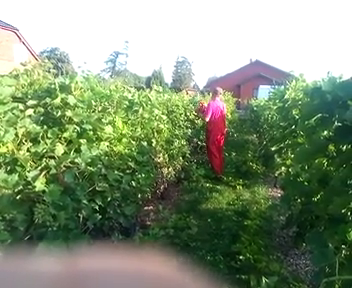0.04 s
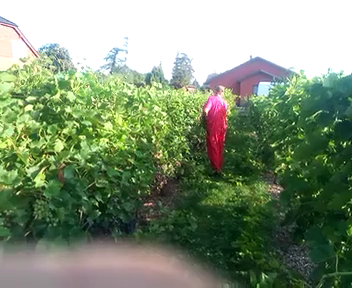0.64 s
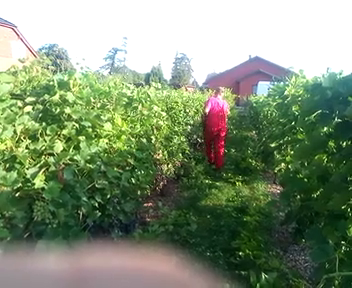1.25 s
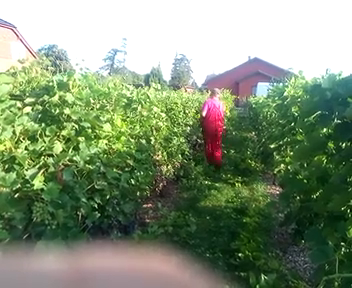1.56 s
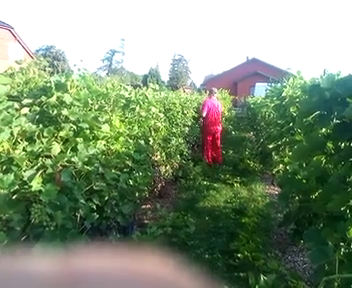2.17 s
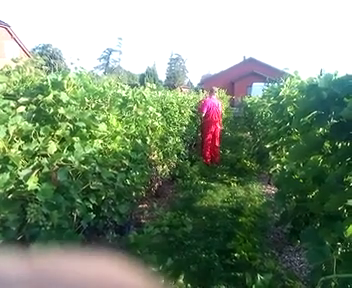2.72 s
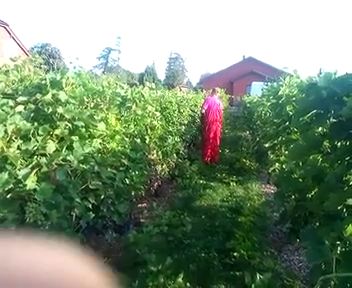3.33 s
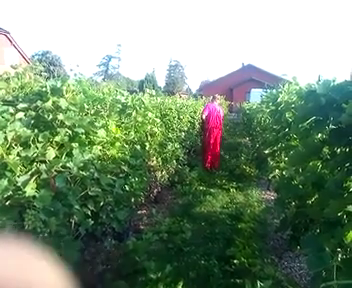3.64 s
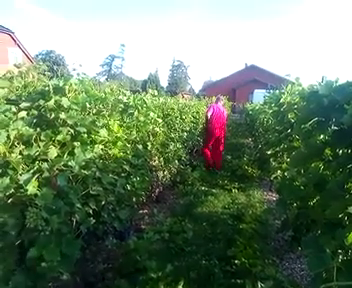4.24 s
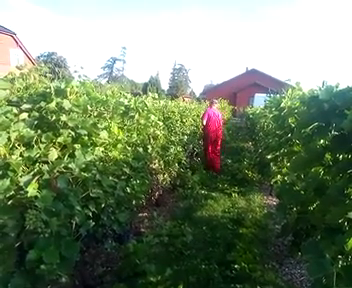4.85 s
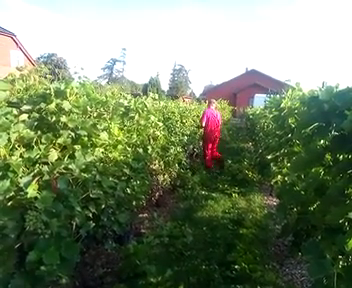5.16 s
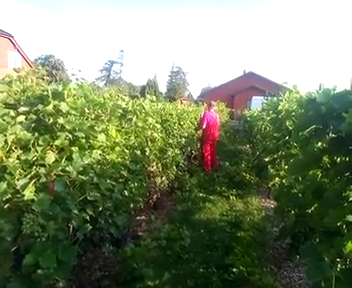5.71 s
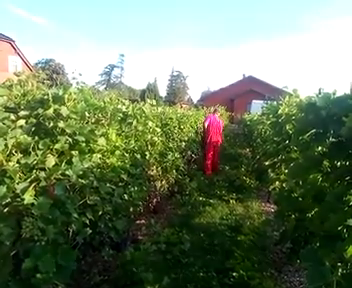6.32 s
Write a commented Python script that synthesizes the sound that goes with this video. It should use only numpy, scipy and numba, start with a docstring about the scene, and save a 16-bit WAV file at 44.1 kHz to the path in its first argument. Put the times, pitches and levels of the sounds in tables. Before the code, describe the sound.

A two-stroke hedge trimmer idles quietly about ten metres away among grapevines, a fast, even puttering with a thin metallic rattle and ring. Leaves rustle faintly now and then over a soft rumble of air. About halfway, a finger bumps and scrapes right at the microphone, followed by one sharp click, by far the loudest sound. The engine keeps idling to the end.

```python
"""A two-stroke hedge trimmer idles among grapevines some ten metres off.
Each firing pops the muffler; about a third of a turn later piston and drive rattle, over ringing steel.
Leaves scatter the sound and rustle as the gardener brushes them; the air rumbles softly.
Midway a finger slides off the camera with bumps, scrapes and squeaks, and its case clicks sharply."""
import sys
import numpy as np
from scipy import signal
from scipy.fft import rfft, irfft
from scipy.io import wavfile
from scipy.ndimage import uniform_filter1d, map_coordinates
from numba import njit

SR = 44100
rng = np.random.default_rng(int(sys.argv[2]) if len(sys.argv) > 2 else 0)


def unload_audio(sound):
    """Save the sound as a 16-bit wav file, at the path given as the first command line argument."""
    columns = np.transpose(np.atleast_2d(sound))
    # keep every value between -1 and 1, then stretch to whole-number steps
    steps = np.round(np.clip(columns, -1, 1) * 32767)
    wavfile.write(sys.argv[1], SR, steps.astype(np.int16))


N = 290178
TIME = np.arange(N) / SR
IDLE_HZ = 44.47

# midrange arriving via the leaves: (time [s], relative level [dB])
WASH_LEVEL = [(0.0, -44.5), (0.3, -48.5), (0.8, -51), (2.3, -55), (2.7, -52.5), (3.1, -56), (3.4, -53),
              (6.4, -57), (6.58, -54)]
# trimmer treble: (time [s], relative level [dB])
TREBLE_LEVEL = [(0.0, -57), (1.2, -68.5), (2.4, -68), (2.9, -60.5), (3.1, -66), (3.4, -63.5), (3.8, -64),
                (4.5, -64), (4.9, -69), (5.2, -72), (5.9, -62.5), (6.2, -67.5), (6.58, -61.5)]
# rumble of air and of finger drag: (frequency [Hz], level [dB])
RUMBLE_SPECTRUM = [(20, -23), (40, -20), (68, -1.5), (95, -4), (125, -8), (200, -16.5), (400, -18.5),
                   (1000, -44), (4000, -61), (16000, -84.5)]


def exhaust(turns):
    """Each firing rings muffler and outlet, with gas noise, leaf scatter, a low boom and a hum."""
    # muffler swinging in and out of the leaves: (time [s], relative level [dB])
    pop_level = [(0, -45.5), (.3, -45.5), (.65, -50), (1.15, -43), (1.45, -45.5), (1.9, -55), (2.25, -61.5),
                 (2.42, -49.5), (2.7, -45), (2.95, -49.5), (3.12, -62.5), (3.4, -51.5), (4.0, -49.5),
                 (4.5, -47.5), (4.72, -46), (4.82, -62), (5.2, -62), (5.32, -51), (6.58, -52.5)]
    # outlet resonance as the tool turns: (time [s], frequency [Hz])
    outlet_pitch = [(0, 900), (.25, 970), (.55, 1025), (1.0, 964), (1.6, 886), (2.2, 896), (3.3, 956),
                    (4.3, 844), (4.95, 918), (5.6, 970), (5.85, 900), (6.58, 910)]
    # muffler pop, leaf scatter, boom: (frequency [Hz], level [dB])
    pop_spectrum = [(300, -25.5), (520, -23), (600, 5), (660, 13.5), (780, 7), (1000, -5.5), (1120, -16),
                    (1500, -10), (2200, -20.5)]
    scatter_spectrum = [(300, -25.5), (510, -31), (580, -13.5), (650, 3), (780, 4.5), (930, 3.5), (1020, 3),
                        (1120, -1.5), (1220, -0.5), (1400, 3), (1530, 0), (1650, -11.5), (1900, -6.5),
                        (2200, -10.5), (3000, -71.5)]
    boom_spectrum = [(120, -25.5), (240, -9), (340, 4.5), (400, 3), (440, -3.5), (480, -2.5), (600, 7),
                     (1000, -57)]
    pop_db, wash_db = change(pop_level), change(WASH_LEVEL)
    firing_turns, echo_s = .74, .00656  # echo off the vine row
    firings = strokes(turns, lag_turns=firing_turns, jitter_s=.00017, scatter_db=1.5)
    echoes = strokes(turns, lag_turns=firing_turns + echo_s * IDLE_HZ, jitter_s=.00025, scatter_db=1.7)
    # crisp in plain sight, blurred behind the vines
    in_sight = np.clip(.8 + .17 * pop_db, .15, 2.2)
    pops = in_sight * unit(firings + undb(-1.5) * echoes)
    flutter = leaf_scatter(firings, decay_s=.012) + undb(-2) * bursts(firings, decay_s=.009, steady=.25)
    pop_hz = 864 - 8 * (pop_db - wash_db)  # lower as it stands out of the wash
    muffler = resonate(colour(pops + flutter, pop_spectrum), pop_hz, width_hz=163.)
    gas = pops + leaf_scatter(firings, decay_s=.025)
    gas += undb(-3) * bursts(firings, decay_s=.016, steady=.9)
    outlet_hz = curve(outlet_pitch)
    outlet = resonate(resonate(gas, outlet_hz, width_hz=123.), outlet_hz, width_hz=180.)
    wash = leaf_scatter(firings, decay_s=.03) + undb(2) * bursts(firings, decay_s=.016, steady=.9)
    boom = unit(colour(bursts(firings, decay_s=.022, steady=1.7), boom_spectrum))
    hum = np.sin(2 * np.pi * 7 * turns + .7 * walk(22)) * undb(2.5 * walk(14))  # 7th crank harmonic
    wash = leaf_echoes(colour(wash, scatter_spectrum), lag_s=.002966, share=.32)
    return (even(muffler) * undb(-55.5 + pop_db)
            + even(outlet) * undb(-56 + .72 * wash_db + swell_db("outlet"))
            + even(wash) * undb(-51 + .72 * wash_db + swell_db("wash"))
            + leaf_shade(boom) * undb(-65.5 + change(TREBLE_LEVEL) + swell_db("boom"))
            + unit(hum) * undb(-74 + swell_db("hum")))


def mechanism(turns):
    """Piston slap and loose drive parts knock once a turn, over ringing steel and cutter-bar modes."""
    # housing knock: (time [s], relative level [dB])
    knock_level = [(0.0, -56), (0.5, -55), (1.6, -55.5), (2.1, -58.5), (3.15, -61.5), (3.35, -52.5),
                   (4.7, -58.5), (5.25, -60.5), (5.5, -68), (5.67, -63.5), (5.8, -77), (5.92, -60.5),
                   (6.25, -55.5), (6.58, -59)]
    # housing knock, drive rattle, its bright edge: (frequency [Hz], level [dB])
    housing_spectrum = [(1200, -39.5), (1680, 6), (1840, -7), (2160, 10), (2370, -1.5), (2600, 0.5),
                        (2800, 7), (4000, -43)]
    rattle_spectrum = [(1800, -49.5), (2500, 2.5), (2850, -3.5), (3050, -4.5), (3300, 6.5), (3650, -0.5),
                       (3900, 5), (4180, -9.5), (4450, 2), (4900, -3.5), (5300, -62.5)]
    edge_spectrum = [(4000, -53.5), (4900, 12), (5600, 12), (6050, 11), (6400, 14.5), (6680, -3.5),
                     (7060, 8), (7330, -10.5), (7700, -4), (8050, -24.5), (9500, -28), (16000, -58)]
    wash_db, knock_db, treble_db = change(WASH_LEVEL), change(knock_level), change(TREBLE_LEVEL)
    housing_db, edge_db = -57.5 + knock_db, -67.5 + treble_db
    drive_db = .54 * wash_db + .37 * treble_db + swell_db("drive")
    slaps = strokes(turns, lag_turns=1.11, jitter_s=.0006, scatter_db=1.1)
    # each slap shakes loose an 8 ms cluster of contacts
    contacts = np.sqrt(np.maximum(uniform_filter1d(slaps ** 2, size=360), 0))
    clatter = bursts(contacts, decay_s=.011, steady=.75)
    jingle = bursts(contacts, decay_s=.02, steady=3)
    knock = bursts(contacts, decay_s=.017, steady=.15)
    housing = unit(colour(knock, housing_spectrum)) * undb(housing_db)
    rattle = unit(colour(clatter, rattle_spectrum)) * undb(-56 + drive_db)
    edge = leaf_echoes(colour(jingle, edge_spectrum), lag_s=.002, share=.3) * undb(edge_db)
    steel = ringing_steel(slaps, knock_db, wash_db, treble_db)
    bar = wavering(hz=4311, drift_hz=7, flutter_db=3) * undb(-69 + drive_db + swell_db("bar"))
    bar += ring(jingle, hz=2158, width_hz=25) * undb(housing_db - 13.5)
    bar += ring(jingle, hz=7082, width_hz=30) * undb(edge_db - 19.7)
    return leaf_shade(housing + rattle + edge) + steel + bar


def ringing_steel(slaps, knock_db, wash_db, treble_db):
    """The crankcase pings at each slap; crankcase, clutch drum and blades hold wavering tones."""
    # crankcase ping as the tool turns: (time [s], frequency [Hz])
    ping_pitch = [(0, 2630), (.85, 2820), (1.6, 2754), (3.05, 2744), (3.8, 2910), (4.3, 2830), (4.85, 2714),
                  (6.58, 2804)]
    # blade pitch sags: (centre [s], half length [s], drop [Hz])
    sags = [(2.148, .14, 59.44), (3.463, .19, 110.6), (4.742, .09, 28.5), (5.558, 0.077, 35.4),
            (6.11, 0.053, 30)]
    strikes = unit(slaps) + .4 * bursts(slaps, decay_s=.004, steady=0)
    ping_hz, case_db = curve(ping_pitch), swell_db("case")
    ping = unit(resonate(resonate(strikes, ping_hz, width_hz=110.), ping_hz, width_hz=170.))
    crankcase = even(ping) * undb(case_db) + undb(-6.5) * wavering(hz=2772, drift_hz=6, flutter_db=3)
    sag_hz = sum(hz * bell(s, half_s) for s, half_s, hz in sags)
    drum = wavering(hz=1045, drift_hz=4, flutter_db=2.2)
    blade = wavering(hz=4627 - sag_hz, drift_hz=10, flutter_db=1.7)
    overtone = wavering(hz=6466 - sag_hz, drift_hz=18, flutter_db=3) * (.9 + .4 * walk(250))
    return (crankcase * undb(-62.5 + .17 * knock_db + case_db)
            + drum * undb(-63.5 + 1.28 * wash_db + swell_db("drum"))
            + blade * undb(-64 + .43 * wash_db + swell_db("blade"))
            + overtone * undb(-73 + 1.15 * treble_db + swell_db("overtone")))


def swell_db(name):
    """One part sings out or is shaded as the tool turns."""
    # swells and dips: (centre [s], half length [s], change [dB], part)
    swells = [(.05, 0.18, 2.5, "drive"), (1.5, 0.38, 0.5, "drive"), (2.45, 0.27, 0, "drive"),
              (2.957, 0.78, 2, "drive"), (4.3, 0.16, 0.5, "drive"), (6.302, 0.12, 3.5, "drive"),
              (1.25, .3, 0.5, "wash"), (4.55, .25, 1, "wash"), (0.297, 0.17, 6.5, "outlet"),
              (1.3, 0.27, -4, "outlet"), (4.55, .2, 2, "outlet"), (2.5, .3, -5.5, "outlet"),
              (4.978, 0.086, 7, "outlet"), (5.527, 0.064, -13, "outlet"), (0.102, 0.3, 4.5, "hum"),
              (4.39, 0.35, 15.5, "hum"), (6.516, 0.23, 13, "hum"), (.15, .3, 1.5, "boom"),
              (1.15, 0.15, 3, "boom"), (1.797, 0.26, -2, "boom"), (2.236, 0.069, 6, "boom"),
              (2.798, 0.28, 3.5, "boom"), (3.2, 0.063, -7, "boom"), (4.19, 0.21, 6.5, "boom"),
              (4.95, 0.22, 3, "boom"), (5.5, 0.36, 9, "boom"), (6.297, 1, -2, "boom"),
              (0.46, 0.17, 9.5, "drum"), (4.67, 0.06, 8, "drum"), (0.852, 0.21, 5, "case"),
              (1.45, 0.19, -1, "case"), (1.72, 0.091, 2.5, "case"), (2.127, 0.06, 1.5, "case"),
              (2.866, 0.092, -15, "case"), (3.037, 0.1, 5, "case"), (4.336, 0.16, 3.5, "case"),
              (4.756, 0.2, 2.5, "case"), (5.65, 0.2, -1, "case"), (6.057, 0.043, -10, "case"),
              (6.277, 0.15, 3, "case"), (0.298, .3, 3.5, "blade"), (1.196, 0.12, 4, "blade"),
              (1.803, 0.38, 2.5, "blade"), (2.294, 0.12, -4, "blade"), (2.598, 0.2, 4.5, "blade"),
              (3.24, 0.055, 8, "blade"), (3.755, 0.094, 6, "blade"), (4.302, 0.27, -24, "blade"),
              (4.826, 0.055, 5, "blade"), (5.13, 0.075, -9, "blade"), (6.1, .05, -3, "blade"),
              (5.306, .07, 1.5, "blade"), (5.73, 0.26, 5.5, "blade"), (6.21, 0.039, 7.5, "blade"),
              (1.403, .35, -6, "bar"), (2.254, .13, -5, "bar"), (2.85, 0.22, 3.5, "bar"),
              (3.4, 0.18, -5, "bar"), (4.9, .3, -1, "bar"), (5.38, .1, 5, "bar"), (5.7, .07, 5, "bar"),
              (6.1, 0.086, -13, "bar"), (6.38, 0.083, 2.5, "bar"), (1.302, 0.23, -7, "overtone"),
              (3.185, 0.058, 8.5, "overtone"), (4.148, 0.14, 5, "overtone"), (4.5, 0.17, 9.5, "overtone"),
              (4.805, 0.1, -23, "overtone"), (5.086, 0.098, 10, "overtone"), (5.89, 0.037, 11, "overtone"),
              (6.42, 0.045, 11, "overtone")]
    return sum(db * bell(s, half_s) for s, half_s, db, part in swells if part == name)


def leaf_scatter(x, decay_s):
    """Four diffuse paths through the leaves fade in and out."""
    paths = (walk(2.2) * unit(convolve(x, fade(decay_s) * rng.standard_normal(SR // 2)))
             for _ in range(4))
    return unit(sum(paths))


def leaf_echoes(x, lag_s, share):
    """Three echoes off nearby leaves come and go, shifting the colour."""
    out = x
    for reach in (.37, 1, 1.61):
        echo = map_coordinates(x, [(TIME - reach * lag_s) * SR], order=1)
        out = out + share * np.tanh(walk(3.5)) * echo
    return unit(out)


def leaf_shade(x):
    """Swaying leaves shade narrow bands in random patches."""
    patch_hz, patch_s, depth_db = 190, .1, 2.
    hz, s, bands = signal.stft(x, SR, nperseg=1024)
    patches = rng.standard_normal((int(hz[-1] / patch_hz) + 2, int(s[-1] / patch_s) + 2))
    grid = np.meshgrid(hz / patch_hz, s / patch_s, indexing="ij")
    gain = undb(depth_db * map_coordinates(patches, grid))
    gain /= np.sqrt(np.mean(gain ** 2, axis=1, keepdims=True))
    return signal.istft(bands * gain, SR)[1][:N]


def moving_hollow(x):
    """A hollow in the midrange drifts between about 1.4 and 2 kHz."""
    # path of the hollow: (time [s], centre [Hz], share cancelled [0-1])
    hollow_path = [(0, 1900, 0.63), (1.201, 1890, 0.7), (1.75, 1860, 0.93), (2.3, 1990, 0.9),
                   (2.9, 1790, 0.48), (4.3, 1700, 0.52), (5.0, 1460, 0.57), (5.45, 1430, 0.5),
                   (5.8, 1590, 0.38), (6.58, 1680, 0.77)]
    s, hz, share = np.transpose(hollow_path)
    band = resonate(x, np.interp(TIME, s, hz), width_hz=690.)
    return x - np.interp(TIME, s, share) * band


def handling():
    """A finger bumps, scrapes and squeaks over the camera case, dragging out a rumble; the case clicks."""
    # finger bumps: (time [s], peak [dB], decay [s], low-pass [Hz])
    bumps = [(3.335, -44.5, 0.017, 130), (3.385, -47, 0.022, 160), (3.434, -43.5, 0.022, 260),
             (3.514, -44.5, 0.035, 199), (3.625, -32, 0.018, 696)]
    # case clicks: (time [s], peak [dB], low-pass [Hz])
    clicks = [(3.596, -33, 5000), (3.6221, -31.5, 6000), (3.646, -38, 4000), (3.952, -10, 16000)]
    # sticking skin: (centre [s], half length [s], pitch [Hz], level [dB])
    squeaks = [(3.475, 0.018, 2640, -50), (3.528, 0.0074, 2680, -46), (3.667, 0.0039, 2760, -42)]
    # finger scrapes: (centre [s], half length [s], level [dB])
    scrapes = [(3.34, 0.022, -53), (3.39, .009, -56), (3.426, 0.063, -50.5), (3.527, 0.042, -52),
               (3.606, 0.0076, -48), (3.66, 0.032, -50), (3.804, 0.15, -59)]
    # bump, click, scrape: (frequency [Hz], level [dB])
    thud_spectrum = [(20, -24), (45, -12), (70, -1), (105, 1), (140, -4), (200, -10), (250, -12), (480, -8),
                     (800, -22), (3000, -50), (9000, -85)]
    click_spectrum = [(60, -9), (200, 5), (700, 0.5), (1900, 3.5), (2600, -8.5), (3400, 3.5), (4400, -1.5),
                      (5600, -10.5), (6700, -17.5), (7800, -29), (10000, -43), (11000, -30), (13000, -32),
                      (16000, -32)]
    rub_spectrum = [(300, -22), (1300, 20), (2200, 7), (5000, 9), (7000, -2.5), (8500, -13), (9100, -42),
                    (9800, -49), (16000, -70)]
    out = np.zeros(N)
    for s, db, decay_s, top_hz in bumps:
        push = noise() * (TIME >= s) * np.exp(-np.abs(TIME - s) / decay_s)
        thud = low_pass(colour(push, thud_spectrum), top_hz)
        out += thud * undb(db) / np.abs(thud).max()
    for s, db, top_hz in clicks:
        tick = low_pass(colour(signal.unit_impulse(N, int(s * SR)), click_spectrum), top_hz)
        out -= tick * undb(db) / np.abs(tick).max()
    for s, half_s, hz, db in squeaks:
        out += wavering(hz, drift_hz=25, flutter_db=1) * bell(s, half_s) * undb(db)
    grains = noise() * undb(2.3 * walk(900) + 1.2 * walk(50))
    rub = unit(colour(grains, rub_spectrum)) * envelope(scrapes)
    contact = np.interp(TIME, [3.29, 3.35, 3.67, 3.74], [0, 1, 1, 0])
    drag = contact * unit(colour(noise(), RUMBLE_SPECTRUM)) * undb(-58)
    return out + rub + drag


def foliage():
    """The gardener brushes leaves and twigs in short, crackly rustles."""
    # brushes: (centre [s], half length [s], level [dB])
    rustles = [(.65, 0.11, -64), (2.87, 0.056, -70.5), (2.99, .04, -70), (3.9, 0.12, -68), (4.22, .06, -64),
               (4.704, 0.086, -67), (4.943, 0.043, -71), (5.313, .06, -73), (5.7, .08, -73),
               (5.87, 0.044, -67), (6.16, 0.069, -66), (6.36, .05, -62.5)]
    # leaf rustle: (frequency [Hz], level [dB])
    rustle_spectrum = [(1500, -36), (3500, -0.5), (5600, 2), (6600, -6), (7700, -5.5), (8100, -17),
                       (9000, -31), (16000, -48)]
    crackle = noise() * undb(4.5 * walk(700))
    return unit(colour(crackle, rustle_spectrum)) * envelope(rustles)


def air():
    """Moving air rumbles in soft gusts over a faint, even hiss."""
    # puffs at the microphone: (centre [s], half length [s], rise [dB])
    gusts = [(0.085, 0.057, 5.5), (0.93, 0.081, 9.5), (1.435, 0.026, 3), (2.0, 1.5, 4), (2.78, 0.058, 6),
             (3.176, 0.03, 7), (4.33, 0.025, 7), (5.98, 0.085, 9), (6.3, .5, 1)]
    # hiss: (frequency [Hz], level [dB])
    hiss_spectrum = [(100, -2), (8000, 5), (9800, -3), (11000, 2), (13500, -3), (14800, 1.5), (16000, 9)]
    gust_db = sum(db * bell(s, half_s) for s, half_s, db in gusts)
    flutter_db = 5 * np.tanh(walk(18))
    rumble = unit(colour(noise(), RUMBLE_SPECTRUM)) * undb(-66.5 + gust_db + flutter_db)
    return rumble + unit(colour(noise(), hiss_spectrum)) * undb(-81)


def strokes(turns, lag_turns, jitter_s, scatter_db):
    """One impulse per crank turn, scattered in timing and strength."""
    chance = rng.standard_normal((int(turns[-1]), 2))
    when_s = np.interp(np.arange(len(chance)) + lag_turns, turns, TIME) + jitter_s * chance[:, 0]
    out = np.zeros(N)
    out[np.clip((when_s * SR).astype(int), 0, N - 1)] = undb(scatter_db * chance[:, 1])
    return out


def bursts(pulses, decay_s, steady):
    """A noise puff per pulse, over a floor of steady times the puffs' mean power."""
    power = np.maximum(convolve(pulses ** 2, fade(decay_s / 2)), 0)
    return unit(noise() * np.sqrt(power / power.mean() + steady))


def wavering(hz, drift_hz, flutter_db):
    """Sustained tone, unsteady in pitch and level."""
    phase = 2 * np.pi * np.cumsum(hz + drift_hz * walk(45)) / SR
    return unit(np.sin(phase) * undb(flutter_db * walk(30)))


def ring(x, hz, width_hz):
    """One mode driven by x, at rms 1."""
    return unit(convolve(x, fade(1 / (np.pi * width_hz)) * np.sin(2 * np.pi * hz * TIME[:SR // 2])))


@njit
def resonate(x, hz, width_hz):
    """State-variable band-pass with a moving centre."""
    y, band, low = np.empty(len(x)), 0., 0.
    for i in range(len(x)):
        g, k = np.tan(np.pi * hz[i] / SR), width_hz / hz[i]
        v = (band + g * (x[i] - low)) / (1 + g * (g + k))
        band, low, y[i] = 2 * v - band, low + 2 * g * v, k * v
    return y


def colour(x, spectrum, size=4096):
    """Minimum-phase filter from (frequency [Hz], level [dB]) rows."""
    hz, db = np.transpose(spectrum)
    bins_hz = np.maximum(np.fft.rfftfreq(size, 1 / SR), 1)
    gain = undb(np.interp(np.log(bins_hz), np.log(hz), db))
    cepstrum = irfft(np.log(gain))
    cepstrum[1:size // 2] *= 2
    cepstrum[size // 2 + 1:] = 0
    return convolve(x, irfft(np.exp(rfft(cepstrum))))


def low_pass(x, top_hz):
    """Second-order treble cut."""
    return signal.sosfilt(signal.butter(2, top_hz, fs=SR, output="sos"), x)


def convolve(x, response):
    """Apply an impulse response."""
    return signal.fftconvolve(x, response)[:N]


def noise():
    """White noise, rms 1."""
    return rng.standard_normal(N)


def walk(rate_hz):
    """Smooth random drift, rms 1."""
    hold = max(int(SR / rate_hz), 2)
    steps = np.repeat(rng.standard_normal(N // hold + 1), hold)
    return unit(uniform_filter1d(uniform_filter1d(steps, hold), hold)[:N])


def fade(decay_s):
    """Exponential decay, 0.5 s long."""
    return np.exp(-TIME[:SR // 2] / decay_s)


def bell(s, half_s):
    """Smooth rise to 1 at time s and back."""
    return np.exp(-((TIME - s) / half_s) ** 2)


def envelope(events):
    """Gain from (centre [s], half length [s], level [dB]) rows."""
    return sum(undb(db) * bell(s, half_s) for s, half_s, db in events)


def curve(table):
    """Join (time [s], value) rows linearly."""
    return np.interp(TIME, *np.transpose(table))


def change(table):
    """Level curve in dB about its mean."""
    return curve(table) - curve(table).mean()


def even(x):
    """Hold rms 1 over a sliding 1/6 s."""
    return x / np.sqrt(uniform_filter1d(x ** 2, size=SR // 6) + 1e-18)


def unit(x):
    """Scale to rms 1."""
    return x / np.sqrt(np.mean(x ** 2))


def undb(db):
    """Decibels to gain."""
    return 10 ** (np.asarray(db) / 20)


def scene():
    """The crank angle times the trimmer; rustles, air and handling join it in mono."""
    # idle hunting: (time [s], offset from IDLE_HZ [Hz])
    hunting = [(0, .03), (.7, .18), (1.5, -.12), (3.0, -.22), (3.35, .58), (4.2, .28), (4.8, -.62),
               (5.45, .23), (6.58, -.17)]
    turns = .18 + np.cumsum(IDLE_HZ + curve(hunting)) / SR + .02 * walk(8)
    trimmer = moving_hollow(exhaust(turns) + mechanism(turns))
    return (trimmer + leaf_shade(foliage()) + air() + handling())[None]


def record(dry):
    """The camera cuts the treble above 15.8 kHz."""
    return signal.sosfilt(signal.ellip(8, .2, 70, 15800, fs=SR, output="sos"), dry)


dry = scene()
out = record(dry)
unload_audio(out)
```